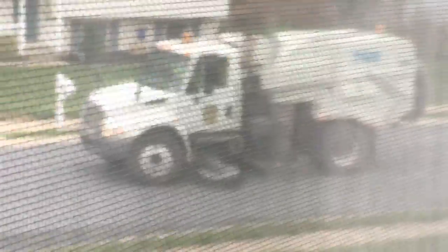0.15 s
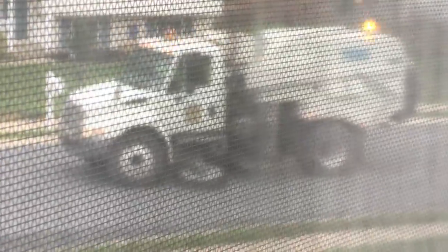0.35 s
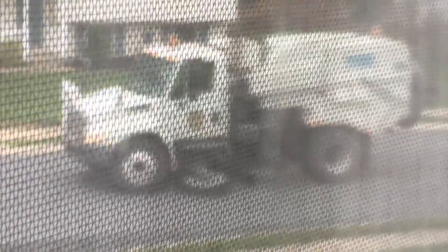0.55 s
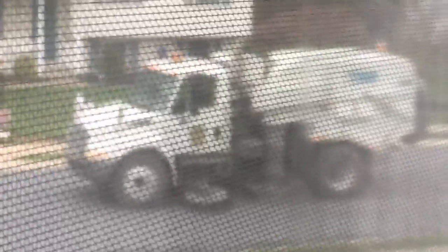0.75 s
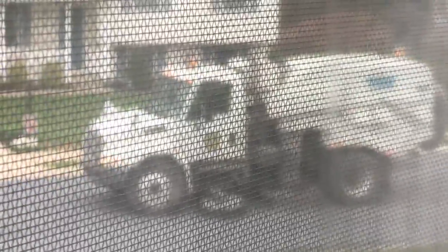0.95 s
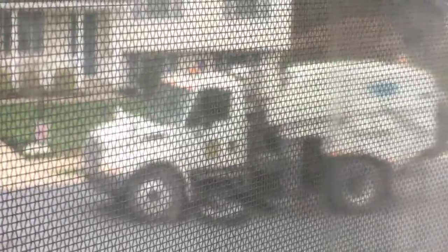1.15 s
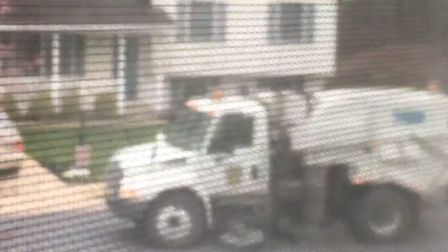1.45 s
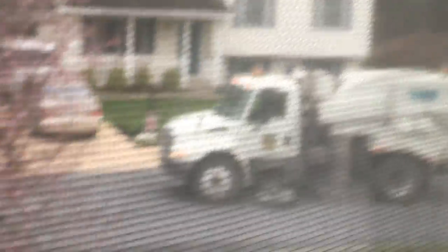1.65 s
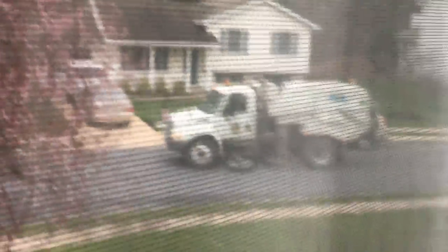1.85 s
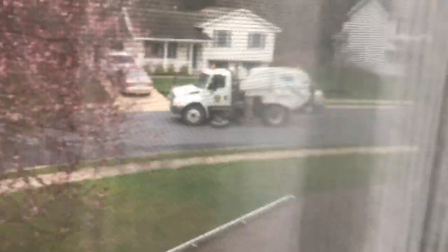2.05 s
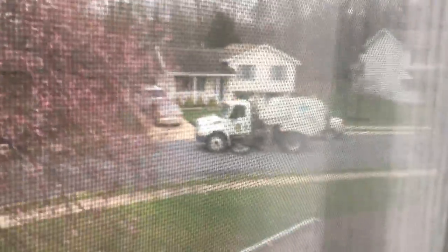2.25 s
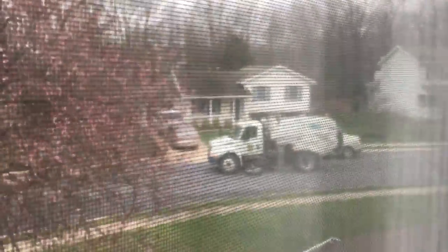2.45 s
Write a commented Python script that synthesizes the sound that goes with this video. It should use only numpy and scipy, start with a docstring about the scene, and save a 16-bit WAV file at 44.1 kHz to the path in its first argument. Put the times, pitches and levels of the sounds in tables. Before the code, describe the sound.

A street sweeper drones throughout on a residential road, heard from a window: steady low diesel throb, suction fan hum, broad roar of air and brushes with thin faint whistles. A small dull tap at about 0.26 s. From 1.6 s airy gliding rushes swell twice close by; a short low hum at 1.85-1.95 s, then tiny metal tags tinkle brightly around 2.1 s. The roar turns slightly brighter towards the end.

```python
"""Through an open upstairs window over a quiet road, a street sweeper is heard working slowly along.
Sine waves make the fixed-speed four-cylinder diesel and the suction fan's shaft and blade tones.
Shaped noise makes the engine's rumble, the roar of air and brushes, and thin whistles. A dull tap comes early.
Near the end a rush of gliding noise swells twice, a short low hum of sine waves sounds close by,
and small metal tags tinkle as tiny clicks set them ringing."""
import sys
import numpy as np
from scipy import signal
from scipy.fft import rfft, irfft
from scipy.io import wavfile

SR = 44100
rng = np.random.default_rng(int(sys.argv[2]) if len(sys.argv) > 2 else 0)


def master_out(mix):
    """Clip the mix to full scale and print it as 16-bit PCM to the path in sys.argv[1]."""
    frames = np.transpose(np.atleast_2d(mix))
    ceiling = np.clip(frames, -1, 1)
    pcm = np.round(ceiling * 32767).astype(np.int16)
    wavfile.write(sys.argv[1], SR, pcm)


N = 114660
T = np.arange(N) / SR  # time in seconds


def amp(db):
    """Turn decibels into a plain multiplier."""
    return 10 ** (np.asarray(db) / 20)


def rms_one(x):
    """Scale a sound to an average (rms) level of 1."""
    return x / np.sqrt(np.mean(x ** 2) + 1e-20)


def curve(rows, column=1):
    """One column of a table, joined by straight lines in time."""
    rows = np.array(rows)
    return np.interp(T, rows[:, 0], rows[:, column])


def drift(rate_hz):
    """Slow random wandering of spread 1: noise smoothed twice, worked out at every 40th sample."""
    step = 40
    r = np.exp(-2 * np.pi * rate_hz * step / SR)
    noise = rng.standard_normal(N // step + 2002)
    slow = signal.lfilter([1], [1, -2 * r, r * r], noise)[2000:]  # drop the filter's start-up
    slow = rms_one(slow - slow.mean())
    return np.interp(np.arange(N) / step, np.arange(len(slow)), slow)


def window(start, end, fade):
    """Fade in, hold, fade out; each fade is centred on its edge (all in seconds)."""
    return np.clip(np.minimum(T - start, end - T) / fade + .5, 0, 1)


def coloured(points):
    """Spectrum of a noise with the given colour, and its frequencies."""
    hz = np.arange(N // 2 + 1) * SR / N + 1e-3
    points = np.array(points)
    db = np.interp(np.log(hz), np.log(points[:, 0]), points[:, 1], left=-80, right=-80)
    return rfft(rng.standard_normal(N)) * amp(db), hz


def narrow(hz, width_hz):
    """Noise of a given width, partly levelled, riding on a carrier whose pitch may move; rms 1."""
    evenness = 0.37  # 0 leaves the noise uneven, 1 makes its strength steady
    lowpass = signal.butter(2, max(width_hz, 10) / 2, fs=SR, output="sos")
    low = signal.sosfilt(lowpass, rng.standard_normal((2, N + 4000)))[:, 4000:]
    low = low / (np.hypot(*low) + 1e-9) ** evenness
    turn = 2 * np.pi * np.cumsum(hz + 0 * T) / SR
    return rms_one(low[0] * np.cos(turn) + low[1] * np.sin(turn))


def highpass(x, order, hz):
    """Keep only what lies above a frequency."""
    return signal.sosfilt(signal.butter(order, hz, "high", fs=SR, output="sos"), x)


def ring(clicks, hz, t60):
    """A unit click sets a sine of height 1 ringing; it falls by 60 dB in t60 seconds."""
    r, w = amp(-60 / (t60 * SR)), 2 * np.pi * hz / SR
    return signal.lfilter([0, np.sin(w)], [1, -2 * r * np.cos(w), r * r], clicks + 1e-18)


def tones(hz, levels_db, waver_db, wander_rad):
    """Steady pitches, each wavering in level and phase."""
    total = 0
    for f, db in zip(hz, levels_db):
        level = amp(db + waver_db * drift(4.5))
        turn = 2 * np.pi * (f * T + rng.random()) + wander_rad * drift(1.42)
        total = total + level * np.sqrt(2) * np.sin(turn)
    return total


CYCLE_HZ, FIRING_S = 14.38, .004  # engine cycles a second; moment of one firing in seconds
FIRING_HZ = 4 * CYCLE_HZ  # four cylinders fire in each cycle
# The exhaust note. Each row: time in seconds, level of the firing tone in dB, level of its octave in dB.
EXHAUST_LEVELS = [(0, -33, -38.5), (.2, -32.5, -39), (.4, -32, -39.5), (.6, -32, -41.5), (.8, -32, -44.5),
                  (1.0, -32, -42), (1.2, -29.5, -44.5), (1.3, -33, -43), (1.43, -29, -41.5),
                  (1.55, -32, -44.5), (1.7, -31, -41), (1.85, -30, -37.5), (2.0, -29.5, -38),
                  (2.15, -31.5, -40.5), (2.3, -29, -39), (2.45, -29.5, -40), (2.6, -28.5, -39.5)]
# Weaker engine tones. Each entry: pitch as a multiple of the cycle rate.
ORDER_MULTIPLES = [2, 6, 7, 12, 14, 16, 19, 20, 22, 23, 24, 28, 32, 38, 42, 44, 46, 48, 51, 76, 130]
# Their loudness, in the same order. Each entry: middle level in dB.
ORDER_LEVELS = [-68, -60, -58, -59, -63, -55, -60, -57, -68, -68, -72, -77, -72, -75, -71, -74, -71, -76,
                -75, -75, -77]
# Colour of the rumble of engine and body between the tones.
# Each row: frequency in Hz, relative strength in dB per Hz.
RUMBLE_COLOUR = [(5, -21), (20, -16), (35, -12), (60, 1), (90, -4), (130, 0.5), (165, -10.5), (270, -10),
                 (340, -15.5), (400, -22), (520, -17.5), (740, -23), (790, -31), (1000, -26.5), (1500, -33)]


def engine():
    """Firing tone and octave locked together suggest a sharp rise and slow fall; weaker tones run loose."""
    turn = 2 * np.pi * FIRING_HZ * (T - FIRING_S)
    firing = amp(curve(EXHAUST_LEVELS)) * np.sin(turn)
    octave = amp(curve(EXHAUST_LEVELS, column=2) + 0.73 * drift(5.9)) * np.sin(2 * turn)
    exhaust = np.sqrt(2) * (firing + octave)
    rumble_db = -49 + 1 * (T - T.mean())  # rises 1 dB a second
    spectrum, _ = coloured(RUMBLE_COLOUR)
    rumble = amp(rumble_db) * rms_one(irfft(spectrum, N))
    orders = tones(CYCLE_HZ * np.array(ORDER_MULTIPLES), ORDER_LEVELS, waver_db=2.5, wander_rad=0.58)
    return exhaust + rumble + orders


FAN_SHAFT_HZ = 41.54
# Tones of the six-bladed fan. Each entry: pitch as a multiple of the shaft rate.
FAN_MULTIPLES = [1, 2, 4, 6, 12, 18]
# Their loudness, in the same order. Each entry: level in dB at the middle, before the later sinking.
FAN_LEVELS = [-59.5, -66, -64, -50.5, -61.5, -70]
# Their steady growth, in the same order. Each entry: rise in dB per second.
FAN_RISES = [0.1, 0.1, 0.52, 2.8, 0.79, 0.3]


def fan():
    """Sines at multiples of the shaft rate; six blades make the sixth one the blade tone."""
    sink_db = -5.5 * window(1.7, 10, 0.13)  # pulls down the upper blade tones from 1.7 s to the end
    levels = []
    for multiple, db, rise in zip(FAN_MULTIPLES, FAN_LEVELS, FAN_RISES):
        levels.append(db + rise * (T - T.mean()) + sink_db * (multiple > 6))
    return tones(FAN_SHAFT_HZ * np.array(FAN_MULTIPLES), levels, waver_db=1.5, wander_rad=.5)


# How the roar changes. Each row: time in seconds, level in dB of its 2400-6300 Hz part,
# share of the late colour from 0 to 1.
ROAR_LEVELS = [(0, -58, 0.13), (.5, -57.5, 0.23), (1.0, -57, 0.3), (1.4, -56, 0.27), (1.6, -55.5, 0.4),
               (1.8, -54, 0.46), (1.95, -55, 0.87), (2.1, -54.5, .85), (2.25, -55, 0.77),
               (2.45, -56.5, .85), (2.6, -55.5, 0.9)]
# Colour of air and brushes at first. Each row: frequency in Hz, relative strength in dB per Hz.
ROAR_EARLY = [(470, -39), (800, -6.5), (941, -19), (1050, -2.5), (1130, -6), (1250, 3), (1380, -7.5),
              (1490, -2), (1750, -6), (2010, -2.5), (2420, -1.5), (2610, 0), (3440, -0.5), (3660, -5.5),
              (4140, -4.5), (4990, -11.5), (6250, -8.5), (6730, -6), (8110, -18.5), (10400, -29.5),
              (12700, -40), (14200, -34), (15700, -30)]
# The brighter colour once the truck has moved on, used above 2100 Hz.
# Each row: frequency in Hz, relative strength in dB per Hz.
ROAR_LATE = [(1290, -31), (2200, -3), (2450, -2), (2550, 0), (2640, -4.5), (3060, -3), (3660, 0.5),
             (3940, -0.5), (4690, -2), (4880, -6), (5440, -3), (6620, -13.5), (7130, -8), (7740, -8),
             (7930, -9), (8340, -7), (8690, -13), (10400, -23.5), (13900, -24.5), (15200, -23),
             (15700, -24)]
# The lower part of that late colour. Each row: frequency in Hz, relative strength in dB per Hz.
LATE_BASS = [(470, -37), (800, -9), (940, -8), (1100, -3), (1500, -1.5), (2000, -2)]


def roar():
    """Air and brush noise in overlapping bands, blending two colours, lightly pulsed at the firing rate."""
    patchy_db, pulse_depth = .5, .06
    late = np.clip(curve(ROAR_LEVELS, column=2), 0, 1)
    late_colour = LATE_BASS + [row for row in ROAR_LATE if row[0] > 2100]
    together = drift(8.5)  # wavering shared by all bands
    out = 0
    for colour, share in ((ROAR_EARLY, 1 - late), (late_colour, late)):
        spectrum, hz = coloured(colour)
        reference = irfft(spectrum * (hz > 2400) * (hz < 6300), N)
        spectrum = spectrum / np.std(reference)
        for centre in 560 * 2 ** np.arange(6):  # Hz, an octave apart
            weight = np.clip(1 - abs(np.log2(hz / centre)), 0, 1)
            band = irfft(spectrum * weight, N)
            flicker = amp(patchy_db * (0.63 * together + drift(10.0)))
            out = out + np.sqrt(share) * band * flicker
    pulse = 1 + pulse_depth * np.sin(2 * np.pi * FIRING_HZ * T)
    return amp(curve(ROAR_LEVELS)) * out * pulse


# Thin whistles in the air stream. Each row: start in seconds, length in seconds, pitch in Hz,
# width in Hz, level in dB.
WHISTLES = [(-.1, 1.55, 6750, 150, -71), (-.1, 1.4, 7200, 90, -74), (.9, .35, 8110, 70, -78),
            (1.5, .36, 7800, 50, -72), (1.85, .27, 7630, 60, -72), (1.55, .5, 8250, 150, -71),
            (2.1, .4, 8200, 260, -68), (2.11, .34, 7200, 240, -69), (1.3, .65, 2690, 80, -68),
            (-.1, .6, 3340, 80, -69), (-.1, 1.4, 2650, 140, -68), (.6, .7, 3450, 150, -70)]


def whistles():
    """Narrow bands of noise that come and go in the air stream."""
    total = 0
    for start, length, hz, width, db in WHISTLES:
        total = total + amp(db) * window(start, start + length, fade=0.058) * narrow(hz, width)
    return total


# The tap's ringing pitches. Each entry: frequency in Hz.
TAP_PITCHES = [560, 780, 950, 1250]


def tap():
    """One small dull tap: a click sets a few low pitches ringing very briefly."""
    click = np.zeros(N)
    click[int(.264 * SR)] = amp(-47.5)
    return sum(ring(click, hz, t60=.02) for hz in TAP_PITCHES)


# Rushes of noise. Each row: start in seconds, length in seconds, pitch in Hz at the start and at the end,
# width in Hz, level in dB at the start and at the end.
RUSHES = [(1.6, 0.27, 1200, 1390, 110, -67, -55), (1.871, .1, 1300, 1450, 170, -60, -60),
          (2.032, 0.15, 600, 680, 140, -58, -56), (2.03, 0.071, 1200, 1100, 1100, -57.5, -56.5),
          (2.12, 0.42, 1250, 1300, 470, -58.5, -56), (2.12, 0.333, 1950, 1900, 580, -58.5, -58),
          (2.43, 0.073, 1350, 1400, 140, -64, -58), (2.2, 0.294, 670, 660, 54, -66, -63),
          (1.8, 0.7, 12500, 12500, 6000, -80, -81), (1.84, .16, 850, 850, 300, -66, -65),
          (2.552, .08, 1250, 1100, 326, -58, -61), (2.48, 0.14, 1880, 1880, 140, -64, -63)]


def rushes():
    """Fluttering swells of noise around a gliding resonance."""
    total = 0
    for start, length, hz_start, hz_end, width, db_start, db_end in RUSHES:
        ends = [start, start + length]
        level = amp(np.interp(T, ends, [db_start, db_end]) + 1.35 * drift(31.0))  # flutter of 1.35 dB
        noise = narrow(np.interp(T, ends, [hz_start, hz_end]), width)
        total = total + level * window(*ends, fade=0.021) * noise
    return total


# Loudness of the hum. Each row: time in seconds, level in dB.
HUM_LEVELS = [(1.81, -60), (1.835, -44), (1.855, -36), (1.9, -38.5), (1.94, -35), (1.955, -45), (1.98, -46),
              (2.0, -60)]
# Its faint overtones. Each row: multiple of the hum's pitch, level in dB below the main tone (negative).
HUM_OVERTONES = [(3, -26), (7, -36)]


def hum():
    """A short, nearly pure low tone with faint odd overtones."""
    pitch_hz, zero_s = 125, 1.9126  # an upward zero crossing; it sets the beat with the exhaust octave
    turn = 2 * np.pi * pitch_hz * (T - zero_s)
    shape = np.sin(turn)
    for multiple, db in HUM_OVERTONES:
        shape = shape + amp(db) * np.sin(round(multiple) * turn)
    fade = window(HUM_LEVELS[0][0], HUM_LEVELS[-1][0], .02)
    return np.sqrt(2) * amp(curve(HUM_LEVELS)) * fade * shape


# Moments when metal tags touch. Each row: time in seconds, click level in dB for the mode struck hardest,
# number of that mode counted from 0.
TOUCHES = [(1.843, -64, 0), (1.85, -69, 4), (1.883, -68, 2), (1.892, -67, 4), (1.9136, -65, 2),
           (1.948, -61, 4), (1.945, -70, 2), (2.0637, -64, 1), (2.0767, -60, 3), (2.0842, -52, 2),
           (2.098, -59, 1), (2.107, -61, 6), (2.113, -57, 1), (2.114, -61, 3), (2.122, -56, 2),
           (2.126, -59, 5)]
# Ways the tags can ring. Each row: pitch in Hz, time to fall by 60 dB in seconds.
TAG_MODES = [(9450, .035), (11100, .05), (11680, .07), (14100, .04), (14400, .04), (14720, .04),
             (15320, .04)]


def tags():
    """Each touch rings one mode hard, the others softly, with a tiny bright tick; a shake adds light touches."""
    touch_s, db, hardest = np.transpose(TOUCHES)
    at = (touch_s * SR).astype(int)
    spread_db = rng.normal(0, 3, (len(at), len(TAG_MODES)))
    shake = window(2.063, 2.063 + .088, .005)
    touch_chance = 110 / SR  # light touches: 110 a second on average for each mode but the first
    ringing = 0
    for k, (hz, t60) in enumerate(TAG_MODES):
        light = (rng.random(N) < touch_chance) * rng.standard_normal(N)
        clicks = amp(-67) * shake * light * (k > 0)
        clicks[at] = amp(db + np.where(hardest == k, 0, -16 + spread_db[:, k]))
        ringing = ringing + ring(clicks, hz, t60)
    # The last mode's light touches stay in, so they tick as well.
    clicks[at] = amp(db.clip(max=-60) - 1)
    tick_decay = amp(-60 / (.015 * SR))  # falls by 60 dB in .015 s
    tick = signal.lfilter([1], [1, -tick_decay], abs(clicks)) * rng.standard_normal(N)
    hiss = amp(-69 + 3 * drift(60.0)) * shake * rng.standard_normal(N)
    return ringing + highpass(tick, 4, 13200) + highpass(hiss, 6, 10500)


def scene():
    """All sources and a faint hiss floor."""
    floor = amp(-89) * rng.standard_normal(N)
    machine = engine() + fan() + roar() + whistles()
    nearby = tap() + rushes() + hum() + tags()
    return (machine + nearby + floor)[None]


def record(dry):
    """The treble above 15850 Hz is steeply cut."""
    return signal.sosfilt(signal.ellip(10, .5, 60, 15850, fs=SR, output="sos"), dry)


dry = scene()
out = record(dry)
master_out(out)
```